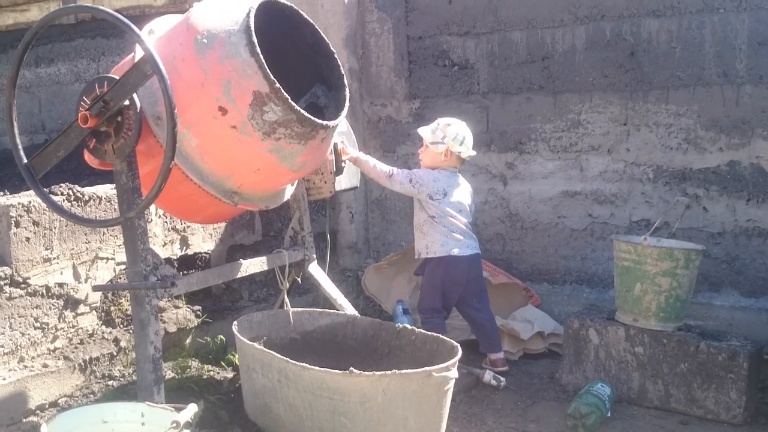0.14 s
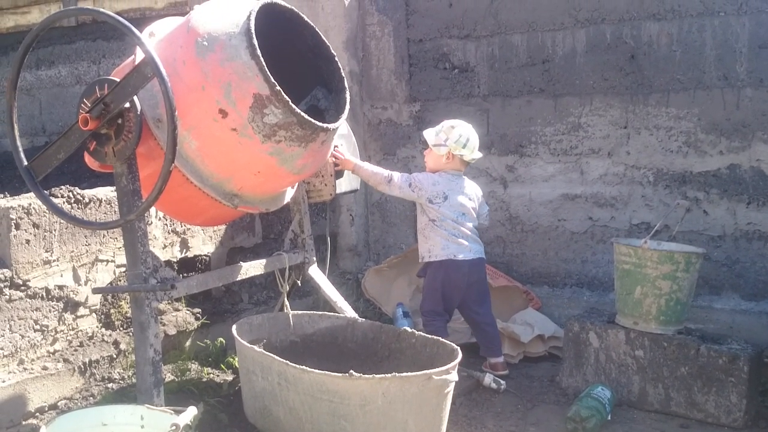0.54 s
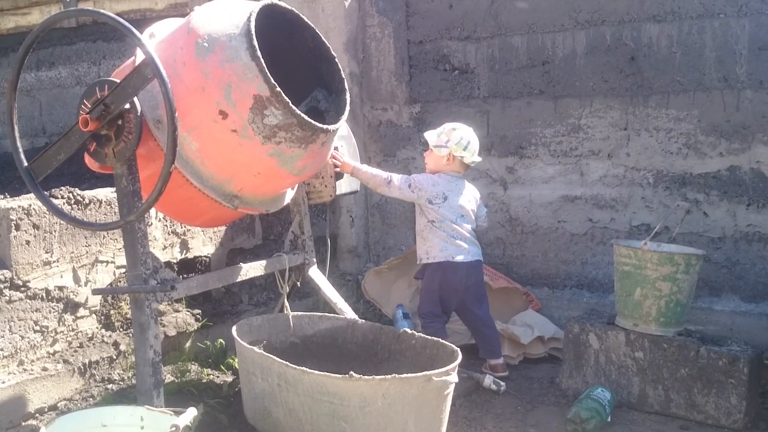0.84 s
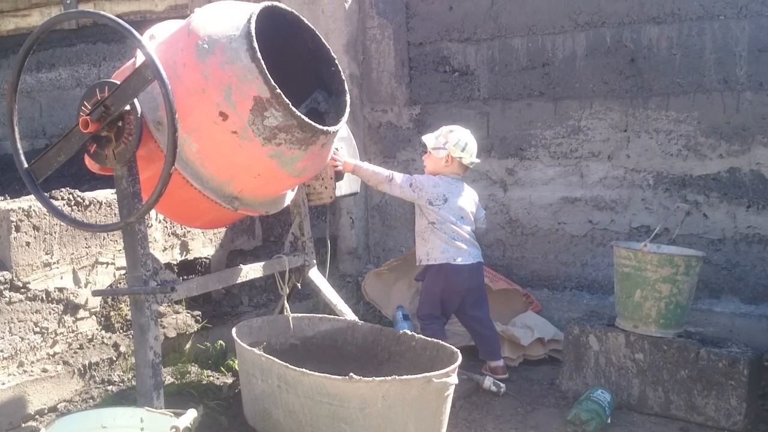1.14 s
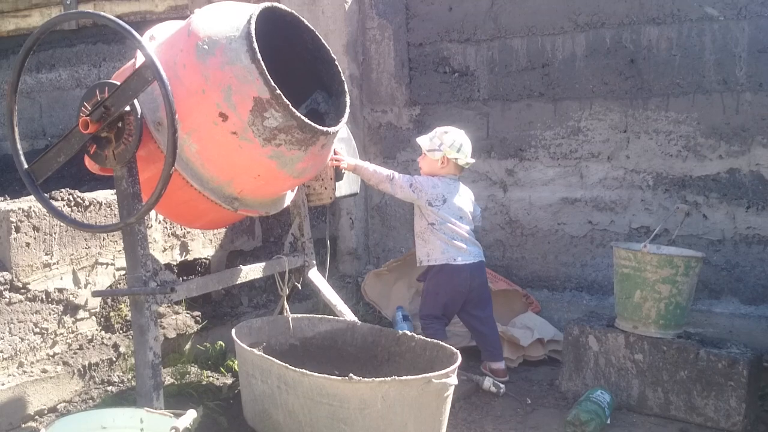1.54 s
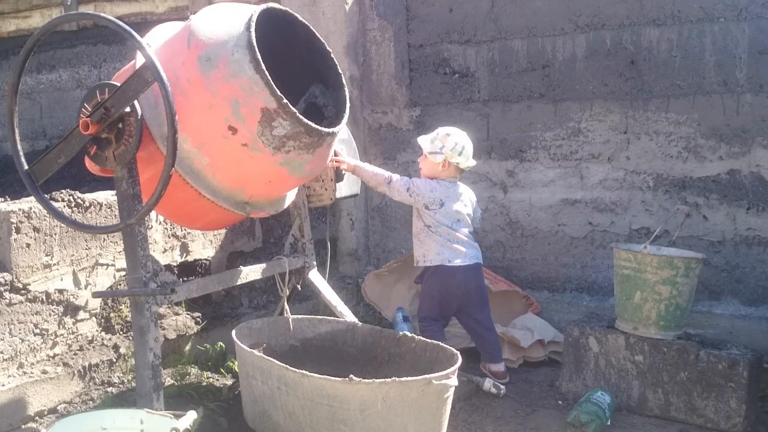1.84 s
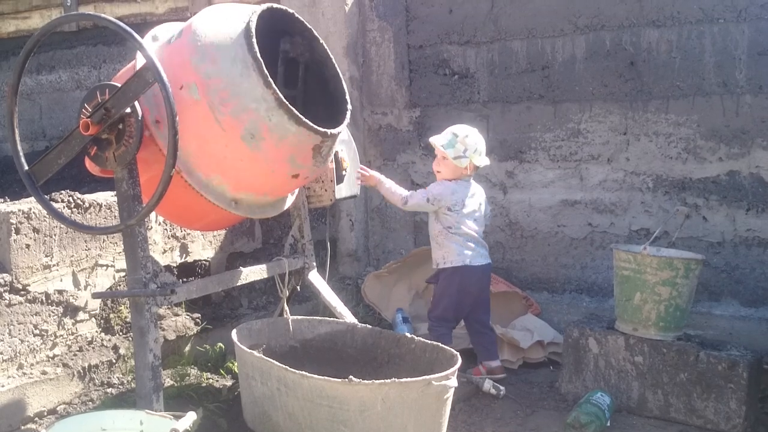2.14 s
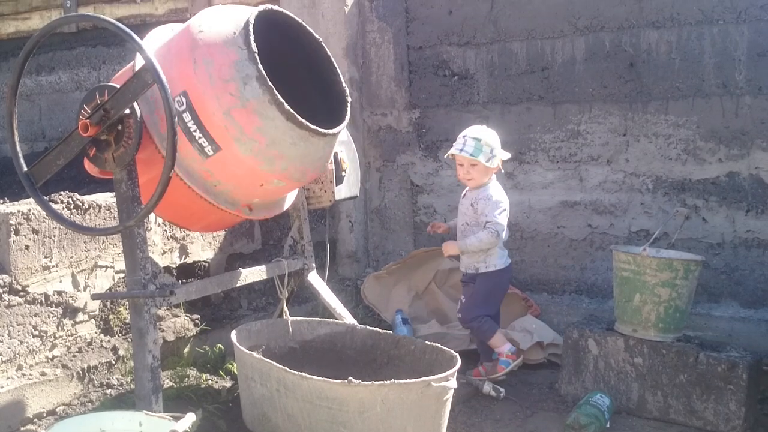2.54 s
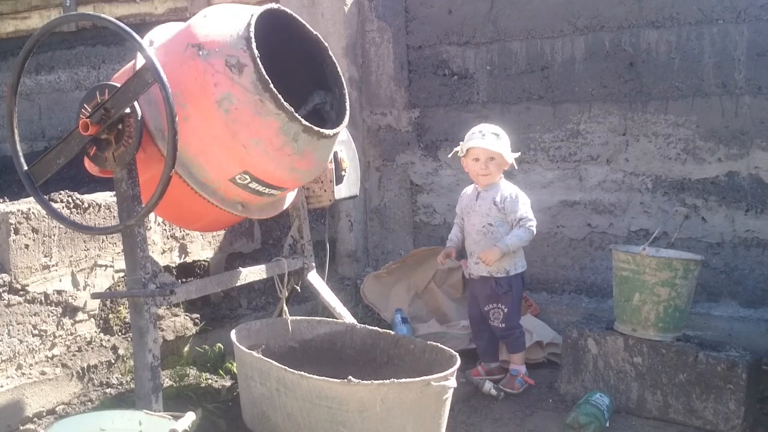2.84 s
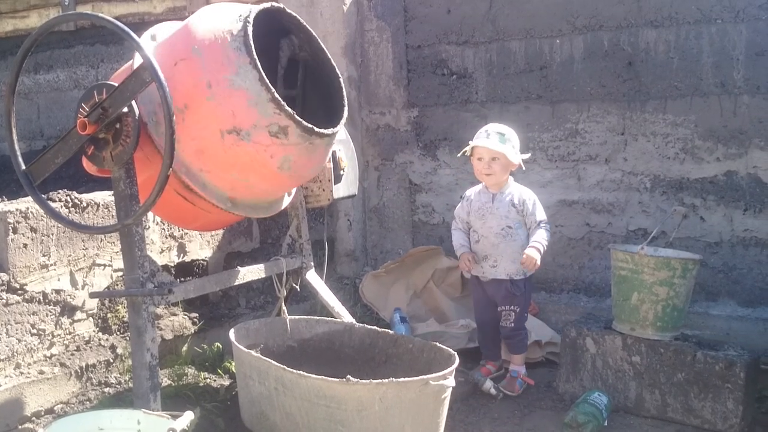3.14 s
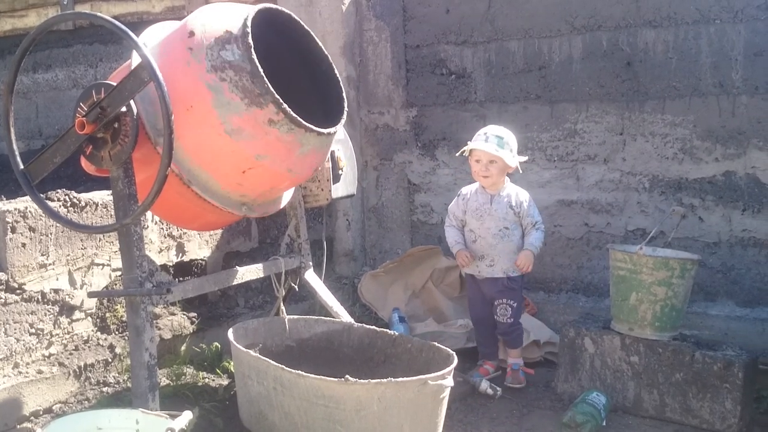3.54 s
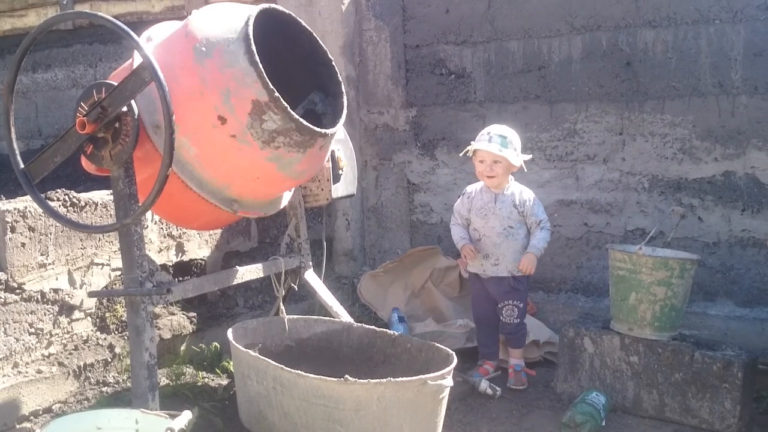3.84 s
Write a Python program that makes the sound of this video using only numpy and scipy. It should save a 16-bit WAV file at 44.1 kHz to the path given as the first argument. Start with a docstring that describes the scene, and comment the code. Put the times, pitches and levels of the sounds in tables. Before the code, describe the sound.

An electric cement mixer starts up in a quiet yard, its steel drum rumbling and gears rattling.

```python
"""A quiet walled yard: faint hiss, light taps and metal clicks, with wind and soft bumps on the microphone pair.
Just before two seconds an electric cement mixer starts: struck shell modes and noise make the steel drum
rumble, wavering sines make the motor hum, and enveloped noise makes the pinion rattle along the ring gear.
Grit scrapes, crackles and ticks in coloured noise, and the drum sings on brief tones. Hollow knocks pair
noise slaps with low booms; near three seconds iron clanks as a noise crash and a few ringing modes."""
import sys
import numpy as np
from scipy import signal
from scipy.fft import rfft, irfft
from scipy.io import wavfile

SR = 44100
rng = np.random.default_rng(int(sys.argv[2]) if len(sys.argv) > 2 else 0)


def digitize_waveform(pressure):
    """Quantize a signal to 16-bit integers and store it at the path in sys.argv[1].

    Rows of a 2-D input are taken as channels; values are limited to [-1, 1].
    """
    field = np.atleast_2d(pressure).T
    bounded = np.clip(field, -1, 1)
    quanta = np.round(bounded * 32767).astype(np.int16)
    wavfile.write(sys.argv[1], SR, quanta)


N = 176400
T = np.arange(N) / SR
FREQS = np.maximum(np.arange(N // 2 + 1) * SR / N, 1)

TEETH_PER_S, TOOTH_AT_S = 65.45, 2.502  # contact rate, and the time of one contact
TOOTH_SPREAD_DB, TOOTH_JITTER_S, TOOTH_DECAY_S = 4, 0.00093, 0.0085


def tooth_contacts():
    """Pinion teeth meet the ring gear almost regularly; rows hold start in s, level in dB, decay in s."""
    period = 1 / TEETH_PER_S
    starts = np.arange(TOOTH_AT_S % period + period, N / SR, period)
    late, strong = np.clip(rng.standard_normal((2, len(starts))), -2, 1.2)
    decays = np.full(len(starts), TOOTH_DECAY_S)
    return np.transpose([starts + TOOTH_JITTER_S * late, TOOTH_SPREAD_DB * strong, decays])


# How loud the gear runs. Each row: time in seconds, level in dB before the gains below.
GEAR_LOAD_CURVE = [(1.8,-83),(1.93,-65),(1.98,-55.5),(2.07,-42.5),(2.24,-46.5),(2.33,-39.5),(2.48,-42),(2.72,-37.5),(2.86,-39),(2.93,-36),(3.0,-43.5),(3.13,-40),(3.28,-41),(3.41,-48),(3.55,-42.5),(3.65,-39),(3.78,-40),(3.88,-38),(4,-41.5)]
# Teeth that catch hard. Each row: start in seconds, level in dB before the gains below, decay in seconds.
HARD_CATCHES = [(1.941,-39.5,0.0091),(2.319,-33,0.0063),(2.471,-27,0.0032),(2.501,-29,0.004),(2.593,-28,0.004),(2.654,-28.5,0.0055),(2.714,-30,0.0071),(2.792,-32,0.0076),(2.96,-31,0.0057),(2.990,-28.5,0.0092),(3.312,-41,0.0036),(3.344,-43.5,0.0057),(3.57,-31,0.0033),(3.603,-28.5,0.0052),(3.632,-31.5,0.019)]
# Colour of the gear. Each row: frequency in Hz, relative level in dB per Hz.
GEAR_COLOUR = [(900, -23), (1400, -5), (1650, -2.5), (1900, 2.5), (2150, 0.5), (2350, -3), (2650, -2),
               (3000, -7.5), (3500, -9), (4500, -21), (8000, -55)]
# Ping of the teeth, moving with the point of contact. Each row: time in seconds, centre in Hz.
TOOTH_PING_PATH = [(2.0,2200),(2.61,2174),(2.69,2687),(2.73,2602),(2.8,2180),(3.0,2064),(3.57,2406),(3.64,2662),(3.73,2600),(3.85,2234)]
GEAR_DB, PING_DB, GRIND_DB, PING_WIDTH_HZ = -6.5, -6.5, -1.5, 223


def gear(teeth):
    """Teeth strike one by one with a ping and a rattle, and grind between strikes."""
    load = level(GEAR_LOAD_CURVE)
    strikes = load * rms_one(bursts(teeth)) + bursts(HARD_CATCHES)
    rattle = from_db(GEAR_DB) * friction(GEAR_COLOUR, grain_db=1.5, modes_db=3.5)
    ping = from_db(PING_DB) * wobbling_ring(TOOTH_PING_PATH, PING_WIDTH_HZ)
    grind = from_db(GRIND_DB) * friction(GEAR_COLOUR, grain_db=4.0, modes_db=4.5)
    return strikes * (rattle + ping) + load * grind


# How loud the drum turns. Each row: time in seconds, level in dB before the gains below.
DRUM_LEVEL_CURVE = [(1.78,-84.5),(1.82,-64.5),(1.92,-54),(2.01,-42.5),(2.45,-41.5),(2.75,-37.5),(3.02,-40),(3.26,-38.5),(3.4,-42.5),(3.6,-40.5),(3.82,-38.5),(4,-37.5)]
# Colour of the rumble. Each row: frequency in Hz, relative level in dB per Hz.
DRUM_COLOUR = [(76, 1), (130, -6), (140, -9.5), (243, -12), (280, -7.5), (365, -11), (397, -2.5),
               (448, -8.5), (635, -2), (740, -8), (872, -2.5), (1110, -10.5), (1220, -7.5), (1500, -8),
               (1950, -48)]
# Steel shell, struck by teeth and knocks. Each row: frequency in Hz, relative level in dB, t60 in seconds.
SHELL_MODES = [(327,-25,0.31),(376,-1.5,0.3),(411.3,-7.5,0.26),(460.5,1,0.28),(531.8,0,0.24),(542,-3,0.46),(630,-1,0.68),(799,2.5,0.12),(1013,-7.5,1),(1162,5.5,0.068)]
SHELL_DB, RUMBLE_DB, TUMBLE_DB = -10, -1.5, 2  # the last is the unevenness of the rumble


def drum(teeth):
    """The shell rings and rumbles with the teeth, the rumble swelling unevenly."""
    tumble = from_db(TUMBLE_DB * drift(22))
    shake = rms_one((2.7 + rms_one(bursts(teeth))) * tumble)
    shell = from_db(SHELL_DB) * rms_one(ring(teeth, SHELL_MODES, spread_db=4.5))
    rumble = from_db(RUMBLE_DB) * shake * friction(DRUM_COLOUR, grain_db=1.0)
    return level(DRUM_LEVEL_CURVE) * (shell + rumble)


# Hollow knocks on the drum. Each row: start in seconds, level in dB before the gains below,
# decay in seconds, pitch in Hz.
DRUM_KNOCKS = [(1.885,-54,0.028,600),(1.942,-35.5,0.0067,560),(1.971,-36.5,0.016,600),(3.095,-24,0.0093,820),(3.103,-27,0.015,565),(3.121,-30.5,0.019,455),(3.138,-30.5,0.033,378),(3.811,-26,0.017,525),(3.905,-28,0.016,335),(3.912,-25,0.027,390),(3.962,-29,0.017,450),(3.987,-35,0.021,490)]
# Colour of a knock's slap. Each row: frequency in Hz, relative level in dB per Hz.
SLAP_COLOUR = [(300,-5),(600,-1),(900,0.5),(2000,-14)]
SLAP_DB, BOOM_DB, KNOCK_DB = -12, -2.5, -15.5  # slap, boom and ringing shell
KNOCK_DB_PER_OCTAVE = 5  # fall of the shell's ring away from the knock's pitch


def knocks():
    """Each knock is a slap and a hollow boom at its own pitch; shell modes near that pitch ring on."""
    slaps = bursts([row[:3] for row in DRUM_KNOCKS])
    out = from_db(SLAP_DB) * slaps * friction(SLAP_COLOUR, grain_db=3.5)
    for *blow, pitch in DRUM_KNOCKS:
        near = [(hz, db - KNOCK_DB_PER_OCTAVE * abs(np.log2(hz / pitch)), t60)
                for hz, db, t60 in SHELL_MODES]
        boom = bursts([blow]) * wavering_tone(pitch, waver=0.03955, rate=61.5)
        out += from_db(BOOM_DB) * boom + from_db(KNOCK_DB) * ring([blow], near, spread_db=1.5)
    return out


# The clank and its bounces. Each row: start in seconds, level in dB, decay of the crash in seconds.
CLANK_BLOWS = [(3.0205,-21.5,0.014),(3.0245,-24.5,0.016),(3.04,-32,0.014)]
# Colour of the crash. Each row: frequency in Hz, relative level in dB per Hz.
CRASH_COLOUR = [(400, -22), (1100, -8.5), (1450, -1), (2000, 3.5), (2600, -11), (3500, -7.5), (5500, -14.5),
                (8000, -16.5), (11000, -14.5), (15000, -27)]
# Ring gear when struck. Each row: frequency in Hz, relative level in dB, t60 in seconds.
IRON_MODES = [(1435,4,0.18),(1614,-1,.07),(1834,1,0.15),(1940,7,0.056),(1986,3.5,0.072),(2540,-13,0.23),(3010,-7,0.21),(3274,-14,0.22),(3463,-11,0.17),(3970,-7,0.17),(4953,-7,0.087)]
IRON_DB = -11.5


def clank():
    """Iron slams on iron and bounces: a dense crash and a short ring."""
    crash = bursts(CLANK_BLOWS) * friction(CRASH_COLOUR, grain_db=2, modes_db=3.5)
    return crash + from_db(IRON_DB) * ring(CLANK_BLOWS, IRON_MODES, spread_db=1.5)


# The drum sings. Each row: start in seconds, peak level in dB, length in seconds, pitch in Hz.
DRUM_SINGS = [(2.095,-47.5,0.55,629.7),(2.244,-45,0.16,985),(3.2,-41,0.117,544.5)]


def singing():
    """The rubbed drum sings briefly on one resonance or another, swelling and fading."""
    out = np.zeros(N)
    for start, db, length, hz in DRUM_SINGS:
        swell = np.sqrt(np.maximum(1 - (2 * (T - start) / length - 1) ** 2, 0))
        out += from_db(db) * swell * wavering_tone(hz, waver=0.00933, rate=19.6)
    return out


# How loud the motor hums. Each row: time in seconds, level in dB before the gain below.
HUM_LEVEL_CURVE = [(1.83,-72.5),(1.95,-61.5),(2.07,-34.5),(2.16,-41.5),(2.26,-56),(2.8,-51),(2.88,-43),(2.96,-45),(3.12,-50),(3.33,-59),(3.46,-47.5),(3.7,-50.5),(3.78,-39),(3.85,-44),(3.92,-51),(4,-39.5)]
# Motor and belt tones. Each row: mean frequency in Hz, relative level in dB.
HUM_TONES = [(97.9,-7.5),(104.9,0.5),(62,-20.5),(199.5,-20.5)]
HUM_DB = -1


def motor():
    """Wavering low tones of motor and belt swell along a level curve."""
    tones = sum(from_db(db + drift(2.6)) * wavering_tone(hz, waver=0.0254, rate=14.2)
                for hz, db in HUM_TONES)
    return from_db(HUM_DB) * level(HUM_LEVEL_CURVE) * rms_one(tones)


CRACKLE_PER_S, CRACKLE_S = 89, 0.0015  # mean rate of loose grains, and their decay
CRACKLE_DB = -4.5  # strongest single grain, relative to the scraping


def crackle():
    """Single grains break at random moments; this is their envelope."""
    grains = (rng.random(N) < CRACKLE_PER_S / SR) * rng.uniform(0.22, 1, N)
    decay = np.exp(-1 / (CRACKLE_S * SR))
    return from_db(CRACKLE_DB) * signal.lfilter([1], [1, -decay], grains + 1e-18)


# How loud grit grinds, then rubs. Each row: time in seconds, level in dB before the gains in grit().
GRIT_LEVEL_CURVE = [(1.85, -77.5), (1.98, -67.5), (2.13, -58), (2.22, -59), (2.71, -54.5), (3.15, -53),
                    (3.41, -59.5), (3.54, -55), (3.79, -63), (3.89, -47.5), (4.0, -58)]
RUB_LEVEL_CURVE = [(1.89, -79.5), (1.97, -63), (2.08, -59), (2.14, -54), (2.21, -61.5), (2.53, -58),
                   (3.0, -61.5), (3.13, -61), (3.49, -56.5), (3.63, -56), (4.0, -57)]
# Scrapes of grit. Each row: start in seconds, level in dB before the gain in grit(), decay in seconds.
GRIT_SCRAPES = [(2.319, -49.5, 0.059), (2.365, -38.5, 0.0097), (2.53, -44.5, 0.013), (2.564, -41, 0.0074),
                (2.594, -41, 0.012), (2.672, -43.5, 0.03), (2.744, -38.5, 0.018), (2.9, -40.5, 0.031),
                (3.265, -44, 0.025), (3.345, -39.5, 0.0083), (3.635, -44, 0.064)]
# Sharp ticks of grit on steel. Each row: start in seconds, level in dB, decay in seconds.
GRIT_TICKS = [(.0135, -62, 0.0038), (1.962, -55, 0.0091), (2.018, -50, 0.0069), (2.15, -35.5, 0.0089),
              (2.754, -41.5, 0.012), (2.83, -34.5, 0.0042), (3.045, -40, 0.025), (3.091, -43.5, 0.082),
              (3.198, -43.5, 0.015), (3.22, -44, 0.014), (3.425, -41.5, 0.05), (3.599, -43, 0.029),
              (3.673, -35.5, 0.019), (3.691, -36.5, 0.012), (3.766, -37, 0.024), (3.811, -38, 0.0086),
              (3.839, -31, 0.0069), (3.872, -34, 0.015), (3.897, -38, 0.017), (3.918, -36.5, 0.0084)]
# Colours of scraping, rubbing and ticks. Each row: frequency in Hz, relative level in dB per Hz.
GRIT_COLOUR = [(1500, -20), (3000, 5.5), (4000, 8), (5500, -1.5), (7500, -6.5), (10000, -29), (15000, -30)]
RUB_COLOUR = [(5000, -13), (8000, -9), (9700, -2.5), (11000, -3.5), (13000, -7), (15500, -15)]
TICK_COLOUR = [(2000, -28), (4000, 5), (6500, 2.5), (8000, -3), (10500, 3), (13000, -1.5), (15500, -8)]
GRIT_DB, SCRAPE_DB, RUB_DB = 1.5, 2, 3


def grit():
    """Dry grit rubs and crackles on steel, with louder scrapes and ticks."""
    pressure = from_db(GRIT_DB) * level(GRIT_LEVEL_CURVE) + from_db(SCRAPE_DB) * bursts(GRIT_SCRAPES)
    scraping = pressure * (1 + crackle()) * friction(GRIT_COLOUR, grain_db=1.5, modes_db=3.0)
    rub_gain = from_db(RUB_DB + 2 * drift(25)) * level(RUB_LEVEL_CURVE)
    rubbing = rub_gain * friction(RUB_COLOUR, grain_db=1.5, modes_db=2.5)
    ticks = bursts(GRIT_TICKS) * friction(TICK_COLOUR, grain_db=2.0, modes_db=4.0)
    return scraping + rubbing + ticks


# Loudness of yard air, then wind at the microphone. Each row: time in seconds, level in dB.
YARD_LEVEL_CURVE = [(0,-67),(.21,-72),(.3,-78.5),(.36,-73.5),(.62,-70),(.71,-73),(.88,-68),(1.12,-64.5),(1.28,-69.5),(1.48,-66.5),(1.6,-73)]
WIND_LEVEL_CURVE = [(0,-56),(.3,-73.5),(.58,-63.5),(.8,-68),(.88,-46),(.95,-62),(1.08,-40.5),(1.25,-53.5),(1.45,-53.5),(1.62,-70.5),(2.2,-40.5),(2.42,-44),(2.55,-41),(2.65,-49.5),(3.12,-52),(3.22,-41),(3.33,-52.5),(4,-45.5)]
# Light taps, soft bumps on the microphone, small metal clicks, all before the start.
# Each row: start in seconds, level in dB, decay in seconds.
LIGHT_TAPS = [(.004,-68,0.04),(.055,-64,0.012),(.0832,-47,0.0057)]
MIC_BUMPS = [(.17, -56, 0.017), (1.075, -52, 0.02), (1.18, -48.5, 0.015)]
METAL_CLICKS = [(1.142,-56,0.015),(1.4345,-55,0.0068),(1.793,-61,0.012)]
# Colours of air, wind, taps, bumps, clicks and steady hiss.
# Each row: frequency in Hz, relative level in dB per Hz.
YARD_COLOUR = [(100,5.5),(170,-5),(300,-0.5),(650,2.5),(950,-2),(1400,-5),(2100,-8),(3700,-7.5),(4500,-18),(5500,-19.5),(7500,-33.5),(15500,-29)]
WIND_COLOUR = [(12,12),(25,-6.5),(45,-9.5),(65,-10),(90,-28.5),(300,-42)]
TAP_COLOUR = [(400,-9),(1100,0),(1900,5),(3000,-6.5),(4200,-12),(6000,-23),(9000,-28),(14000,-31)]
BUMP_COLOUR = [(30, -8), (90, -2), (200, -13), (400, -26), (1000, -50)]
CLICK_COLOUR = [(1000,2),(2100,8),(4300,-6),(5400,-1),(6100,-8),(7000,-10),(8500,-16.5),(13000,-22)]
HISS_COLOUR = [(300,-6),(2000,-3),(5000,5),(7500,-2),(15500,-5)]
HISS_DB = -82.5


def yard():
    """Noise shaped as faint outdoor hiss, light taps, metal clicks, and wind and bumps on the microphone."""
    air = level(YARD_LEVEL_CURVE) * friction(YARD_COLOUR, grain_db=1.0)
    wind = level(WIND_LEVEL_CURVE) * friction(WIND_COLOUR, grain_db=9.5)
    taps = bursts(LIGHT_TAPS) * friction(TAP_COLOUR, grain_db=4.5)
    bumps = bursts(MIC_BUMPS) * friction(BUMP_COLOUR, grain_db=1.5)
    clicks = bursts(METAL_CLICKS) * friction(CLICK_COLOUR, grain_db=4.0, modes_db=5.5)
    hiss = from_db(HISS_DB) * friction(HISS_COLOUR, grain_db=0.5)
    return air + wind + taps + bumps + clicks + hiss


# Likeness of the two microphone channels. Each row: frequency in Hz, correlation from -1 to 1.
CHANNEL_LIKENESS = [(30, -0.41), (90, 0.52), (300, 0.9), (600, 0.82), (950, 0.62), (1300, 0.012),
                    (1700, -0.071), (2200, 0.24), (3200, 0.22), (4500, 0.045), (7000, 0.028),
                    (14000, -0.15)]
MODE_SPACING_HZ = 45.07  # spacing of the fine resonances in the steel


def friction(colour, grain_db, modes_db=0):
    """Dense stereo micro-impacts of uneven size, coloured and optionally given fine resonances; unit power."""
    impacts = rng.standard_normal((2, N)) * from_db(grain_db * drift(250))
    lowest, highest = colour[0][0], colour[-1][0]
    edges = 1 / (1 + (FREQS / highest) ** 8) / (1 + (lowest / FREQS) ** 8)
    heights = np.clip(rng.standard_normal(4096), -2, 2)
    crowd = np.interp(FREQS / MODE_SPACING_HZ, np.arange(4096), heights)
    mid, side = rfft(impacts) * from_db(per_hz(colour) + modes_db * crowd) * edges
    alike = np.clip(per_hz(CHANNEL_LIKENESS), -1, 1)
    pair = np.sqrt(1 + alike) * mid + np.sqrt(1 - alike) * side * [[1], [-1]]
    return rms_one(irfft(pair, N))


STRIKE_S = 0.0013  # rise time constant of every contact


def bursts(rows):
    """Sum of contact envelopes: quick rise, exponential fall."""
    out = np.zeros(N)
    for start_s, db, decay in rows:
        start = int(start_s * SR)
        age = T[:max(N - start, 0)][:SR // 2]
        rise = 1 - np.exp(-age / STRIKE_S)
        out[start:start + len(age)] += from_db(db) * rise * np.exp(-age / decay)
    return out


def ring(rows, modes, spread_db):
    """Each blow strikes every decaying mode with a strength and sign of its own."""
    starts, db, _ = np.transpose(rows)
    at = np.minimum((starts * SR).astype(int), N - 1)
    out = np.zeros(N)
    for hz, mode_db, t60 in modes:
        strength = from_db(db + mode_db + spread_db * rng.standard_normal(len(at)))
        blows = np.zeros(N)
        blows[at] = strength * rng.choice([-1, 1], len(at))
        r, w = from_db(-60 / (t60 * SR)), 2 * np.pi * hz / SR  # pole radius and angle
        out += signal.lfilter([0, np.sin(w)], [1, -2 * r * np.cos(w), r * r], blows + 1e-18)
    return out


def wobbling_ring(centre, width_hz):
    """A noise-driven resonance of fairly even strength whose centre follows a curve; unit power."""
    phase = 2 * np.pi * np.cumsum(np.interp(T, *np.transpose(centre))) / SR
    swing = drift(width_hz) + 1j * drift(width_hz)
    evened = swing / (0.5 + np.abs(swing))
    return rms_one(np.real(evened * np.exp(1j * phase)))


def wavering_tone(hz, waver, rate):
    """A sine whose pitch wanders by the share waver."""
    return np.sin(2 * np.pi * np.cumsum(hz * (1 + waver * drift(rate))) / SR)


def drift(rate):
    """Random wander of unit power, slower for a lower rate in Hz."""
    return rms_one(irfft(rfft(rng.standard_normal(N)) / (1 + (FREQS / rate) ** 2), N))


def level(rows):
    """Gain along a level curve, fading in just before its first point."""
    s, db = np.transpose(rows)
    return from_db(np.interp(T, s, db)) * np.clip(1 + (T - s[0]) * 20, 0, 1)


def per_hz(points):
    """A table read at every frequency, straight between points on a log frequency axis."""
    hz, value = np.transpose(points)
    return np.interp(np.log(FREQS), np.log(hz), value)


def from_db(db):
    """Decibels to gain."""
    return 10 ** (np.asarray(db) / 20)


def rms_one(x):
    """Scale to unit power."""
    return x / np.sqrt(np.mean(x ** 2) + 1e-20)


def scene():
    """The mixer in its yard, ahead of the microphone pair."""
    teeth = tooth_contacts()
    machine = gear(teeth) + drum(teeth) + motor()
    return machine + knocks() + clank() + singing() + grit() + yard()


# Balance of the microphone pair. Each row: frequency in Hz, left minus right in dB.
MIC_BALANCE = [(30, -15.5), (70, 4.5), (200, 4.5), (400, 7), (800, 6.5), (1200, 3.5), (1550, -3),
               (2100, 4.5), (2700, 1.5), (3400, -6), (4500, -12), (6500, -10), (8000, -4), (9500, 1),
               (13000, 2.5)]
CUTOFF_HZ = 15700


def record(dry):
    """The two microphone ports colour the sound differently; the top is cut."""
    ports = from_db(per_hz(MIC_BALANCE) * [[0.5], [-0.5]])
    ports = ports / np.sqrt(np.mean(ports ** 2, axis=0))  # keep the summed power of the pair
    taps = np.roll(irfft(ports, N), 1024, axis=1)[:, :2049] * np.hanning(2049)
    heard = signal.fftconvolve(dry, taps, mode="same", axes=1)
    # the stopband, 70 dB down, begins 400 Hz above the cutoff
    top_cut = signal.cheby2(18, 70, CUTOFF_HZ + 400, fs=SR, output="sos")
    return signal.sosfilt(top_cut, heard)


dry = scene()
out = record(dry)
digitize_waveform(out)
```